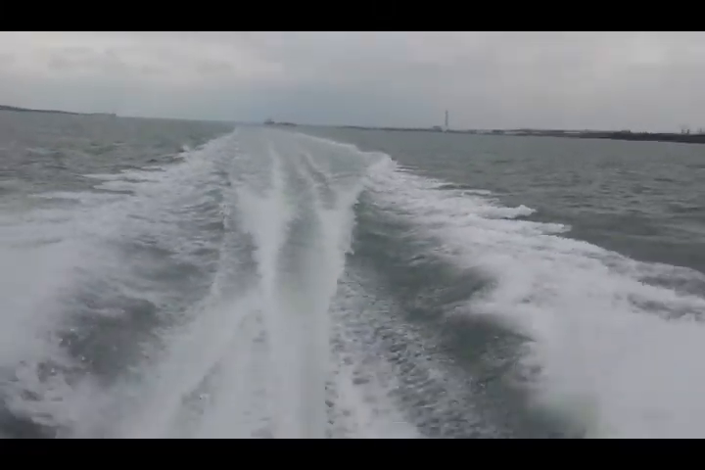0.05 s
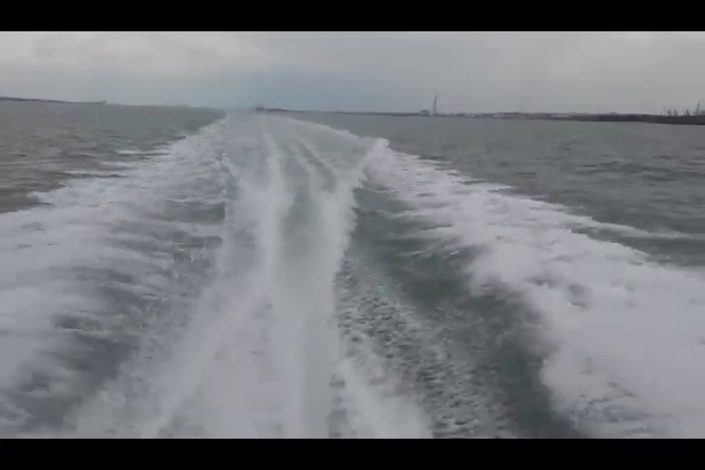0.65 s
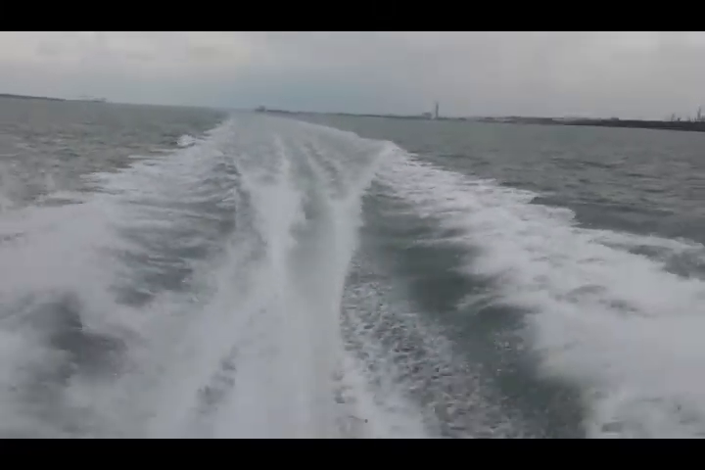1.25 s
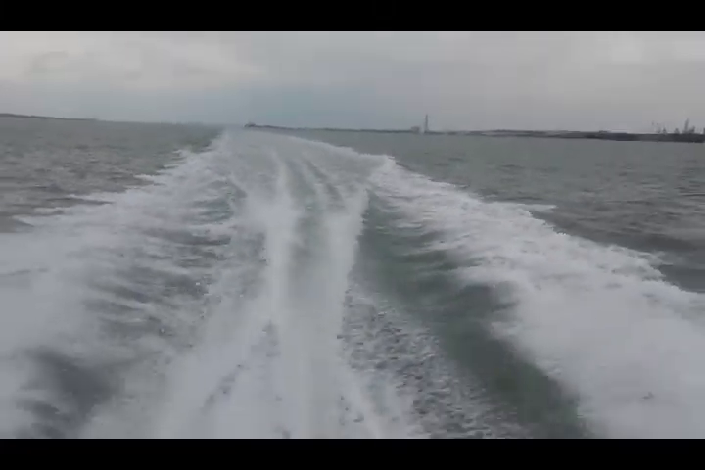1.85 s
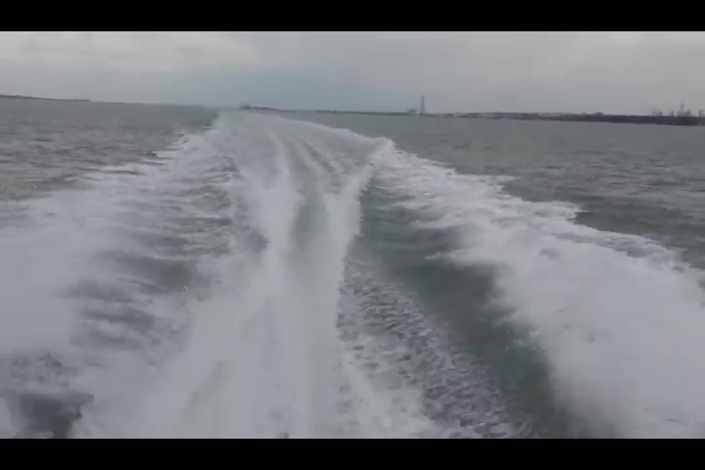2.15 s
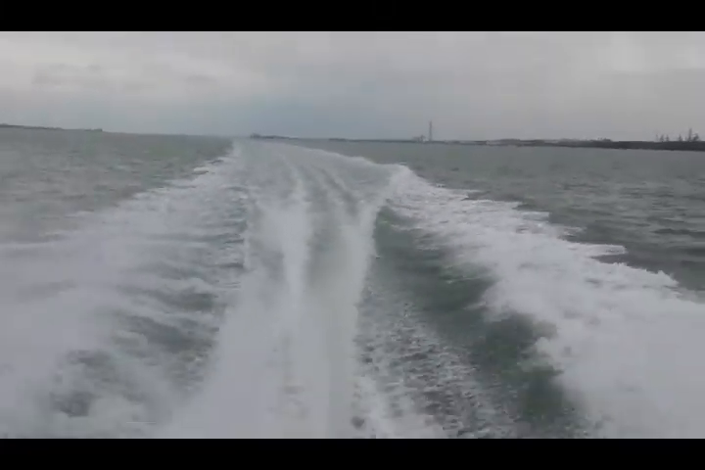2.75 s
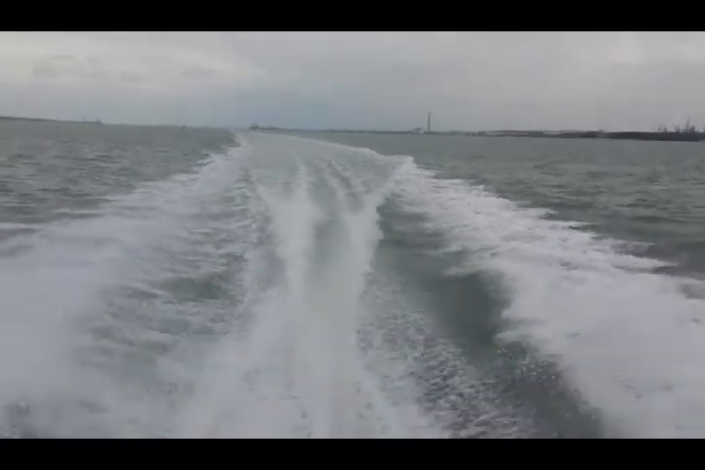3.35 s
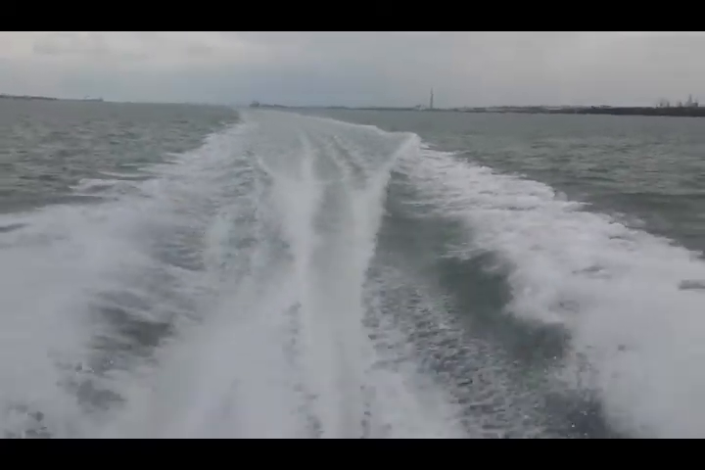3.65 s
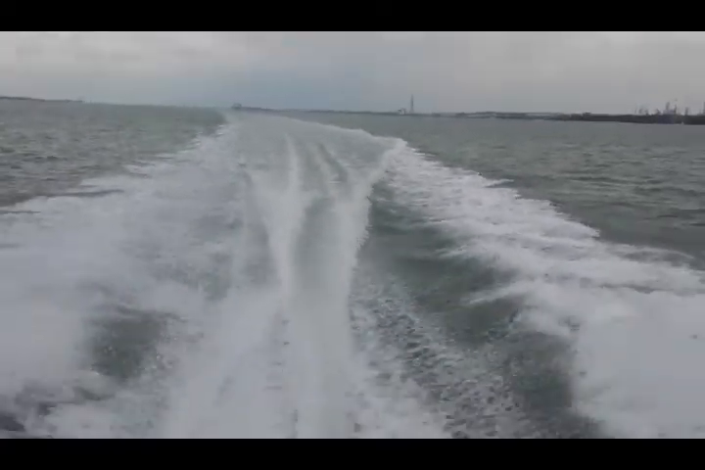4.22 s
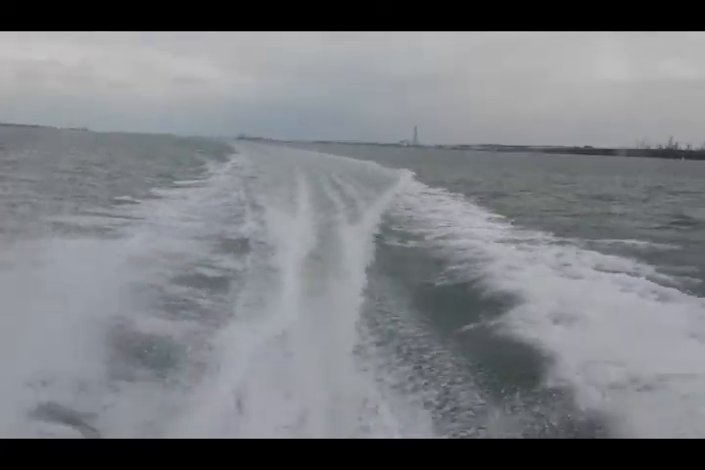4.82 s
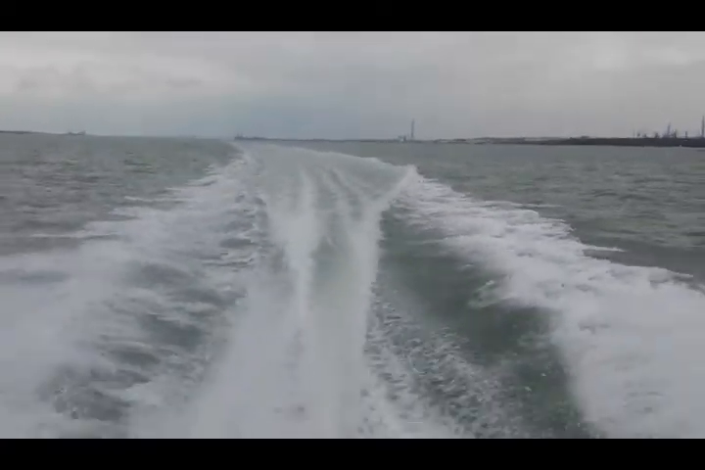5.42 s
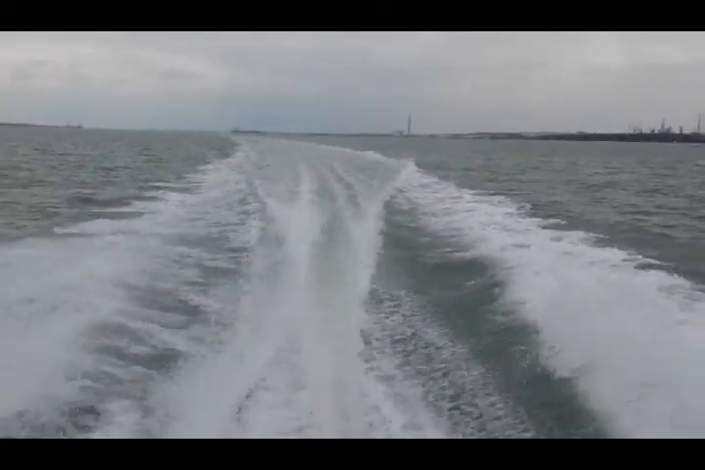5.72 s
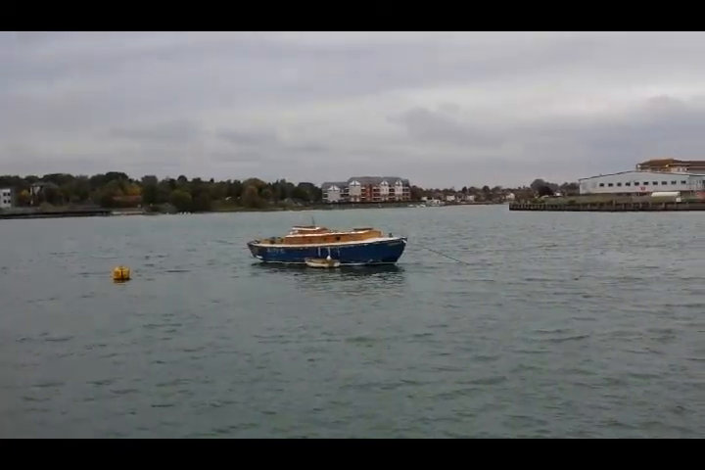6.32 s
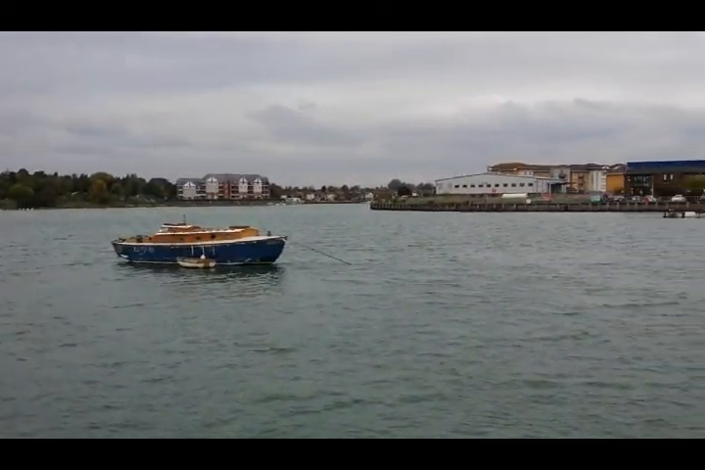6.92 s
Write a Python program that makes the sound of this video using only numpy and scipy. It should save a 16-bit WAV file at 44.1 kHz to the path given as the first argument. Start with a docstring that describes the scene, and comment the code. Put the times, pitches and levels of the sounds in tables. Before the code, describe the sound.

Heard from the stern of a fast motor boat on open water, the engine drones steadily with a thin whine while the churned wake roars and hisses. Small waves thump the hull and spray lands in short splashes. Near the end the sound cuts out for a moment. Then wind buffets the microphone over a very faint wash, with a few quick scuffs on the right side.

```python
"""At the stern of a motor boat at speed. A four-cylinder engine drones and whines, the propeller throbs,
the churned wake roars and hisses, spray lands, and small waves thump the hull. The sound cuts out
for a moment. Then the boat moves slowly: wind buffets the two microphone ports over a faint wash,
and something scuffs against the right one."""
import sys
import numpy as np
from scipy import signal
from scipy.io import wavfile
from scipy.ndimage import uniform_filter1d

SR = 44100
rng = np.random.default_rng(int(sys.argv[2]) if len(sys.argv) > 2 else 0)


def store_pcm(level_fs):
    """Save levels as 16-bit WAV."""
    pcm = np.round(np.clip(level_fs, -1, 1) * 32767).astype(np.int16)
    wavfile.write(sys.argv[1], SR, np.atleast_2d(pcm).T)


N = 307361
TIME_S = np.arange(N) / SR
CUT_S, RESUME_S = 5.822, 6.195
FIRING_ORDER, HOWL_ORDER, WHINE_ORDER = 4, 16, 44   # multiples of the cycle rate

# engine speed (time [s], four-stroke cycle rate [Hz])
CYCLE_RATE = [(0.0, 36.89), (0.45, 36.9), (0.89, 36.74), (1.19, 36.83), (1.34, 36.71), (1.78, 36.74),
              (1.93, 36.94), (2.83, 36.67), (3.12, 36.72), (3.57, 36.94), (3.87, 36.84), (4.16, 36.55),
              (4.76, 36.76), (5.06, 36.83), (5.65, 36.75), (5.8, 36.9)]
# exhaust drone (order, relative level [dB])
EXHAUST_ORDERS = [(1, -28.5), (2, -11), (3, -10.5), (4, 0), (5, -12.5), (6, -16.5), (7, -14.5), (8, -3),
                  (9, -18), (10, -15), (11, -19.5), (12, -19.5), (13, -15.5), (14, -21), (15, -18),
                  (16, -12), (17, -32.5), (18, -24), (19, -21), (20, -37), (21, -31.5), (22, -29.5),
                  (23, -38.5), (24, -25.5), (25, -27), (26, -28.5)]
# mechanical buzz above the drone (frequency [Hz], level per order [dB])
BUZZ_SPECTRUM = [(980, -58.5), (1080, -54.5), (1200, -41), (1350, -47.5), (1560, -44.5), (1850, -62),
                 (2200, -52.5), (2500, -64)]
# firing note between waves (time [s], level [dB])
FIRING_LEVEL = [(0, -16.5), (.7, -18), (1.3, -17), (2.4, -16.5), (4.85, -18.5), (5.15, -15.5), (5.8, -16)]
# octave over the firing note (time [s], relative level [dB])
OCTAVE_LEVEL = [(0.0, -22.5), (0.89, -19), (1.04, -22.1), (3.12, -22), (3.42, -26), (4.61, -21.5),
                (5.8, -24.5)]
# howl, two octaves over the firing note (time [s], level [dB])
HOWL_LEVEL = [(0.0, -26), (1.93, -30), (2.23, -23.5), (2.38, -30.5), (2.83, -30), (3.42, -25),
              (3.87, -27.5), (4.16, -34), (4.31, -31.5), (5.06, -28.5), (5.8, -29)]
# gear whine (time [s], relative level [dB])
WHINE_LEVEL = [(0.0, -33), (0.15, -34), (0.89, -30), (1.78, -35.5), (1.93, -37), (2.08, -33.7), (2.83, -27),
               (3.72, -32.5), (4.31, -29), (4.76, -34.7), (5.06, -26.5), (5.21, -34), (5.8, -32.9)]
# propeller tones (blade-rate harmonic, level [dB])
BLADE_HARMONICS = [(1, -24.5), (2, -25.5), (3, -43)]
# tones at the ports (frequency [Hz], left lead [rad], left-right [dB])
TONE_STEREO = [(70, .02, -1), (150, .07, -.5), (295, 0.36, -3), (474, .2, 2.5), (583, 1.2, -2),
               (704, 0.75, 0), (830, 0.43, -4.5), (1180, 2.22, 2.5), (1620, 2.57, 8)]

# wake strength (time [s], relative level [dB])
WAKE_LEVEL = [(0.0, -27.5), (0.3, -29), (0.89, -27.5), (1.78, -27), (2.83, -28), (4.31, -28.0), (4.46, -26),
              (4.76, -32), (5.06, -27.5), (5.8, -29)]
# low wake roar (frequency [Hz], relative density [dB])
ROAR_SPECTRUM = [(25, -23.5), (42, -2), (65, -5.5), (120, 2), (200, 2), (320, 1), (450, -9), (650, -11),
                 (900, -21.5), (1400, -26.5)]
# mid wake rush (frequency [Hz], relative density [dB])
RUSH_SPECTRUM = [(450, -8), (750, -1.5), (1050, -1), (1600, 3.5), (2100, -4), (2600, -6), (3600, -11.5),
                 (5500, -26.5)]
# hiss of fine drops (frequency [Hz], relative density [dB])
SPRAY_SPECTRUM = [(1800, -15), (2800, -3), (3700, -1.5), (4900, 1.5), (6300, 2), (7800, -0.5),
                  (10000, -18.5), (12500, -20.5), (14500, -30)]
# wake likeness at the ports (frequency [Hz], correlation [-1..1])
WAKE_CORRELATION = [(60, 0.7), (150, 0.7), (320, 0.98), (650, 0.3), (950, 0.1), (1350, -0.19),
                    (2100, -0.02), (3000, 0), (14000, 0)]
# wake balance (frequency [Hz], left-right [dB])
WAKE_PAN = [(60, -0.5), (370, 0), (800, -2), (1250, 0), (2300, 1), (4400, -4), (6200, 1), (7800, -10.5),
            (10000, -18.5), (13000, -26.5)]
# waves hitting the hull (time [s], relative level [dB], firing-note dip [dB])
WAVE_HITS = [(.865, -8.5, 6), (1.62, -13, 3), (2.245, -10, 5.5), (3.46, -16.5, -1), (3.71, -16.5, -1.5),
             (4.09, -9.5, 1.5), (4.29, -19.5, 15.5), (5.57, -10.5, 1)]
# spray landing (time [s], relative level [dB], t60 [s])
SPLASH_HITS = [(0.952, -22.5, 0.2), (0.998, -13.5, 0.084), (1.48, -17.5, 0.046), (1.733, -16.5, 0.043),
               (1.785, -19, 0.018), (1.911, -15, 0.02), (2.066, -22, .012), (2.453, -12.5, 0.011),
               (3.323, -21, 0.046), (3.533, -17, 0.08), (3.696, -18, .012), (4.214, -17.5, 0.032),
               (4.44, -28, .06), (4.683, -18, 0.037)]
# landing drops (frequency [Hz], relative density [dB])
SPLASH_SPECTRUM = [(1200, -6.5), (3500, 9.5), (6500, 6.0), (9000, -5), (13000, -17.5)]

# wind on the ports (time [s], relative level [dB])
WIND_LEVEL = [(6.195, -40), (6.25, -32.5), (6.37, -27), (6.42, -19.5), (6.97, -24)]
# wind rumble (frequency [Hz], relative density [dB])
WIND_SPECTRUM = [(25, -34), (45, -16), (70, -2.5), (130, 2), (280, -1.5), (500, -7.5), (800, -13),
                 (1200, -24.5), (2000, -41), (3500, -53)]
# wind balance by band (frequency [Hz], relative left-right [dB])
WIND_PAN = [(60, 2), (200, 3.5), (500, -2), (900, -5), (3000, 2)]
# scuffs on the right port (time [s], relative level [dB], t60 [s])
SCUFF_HITS = [(6.229, -23.5, 0.046), (6.27, -25, .04), (6.281, -21, 0.034), (6.309, -15, 0.025),
              (6.336, -11, 0.015), (6.351, -14, 0.062), (6.382, -16.5, 0.032), (6.478, -2, 0.021),
              (6.485, -8.5, 0.044), (6.508, -26.5, 0.15), (6.692, -31, 0.019), (6.788, -23.5, 0.031),
              (6.839, -28, 0.018), (6.896, -19.5, 0.0086)]
# cavity behind the port (frequency [Hz], width [Hz], relative gain [dB])
CAVITY_MODES = [(500, 670, 0.5), (1040, 330, 6.5), (1370, 230, -0.5), (1690, 360, -1.5), (2520, 850, -10.5),
                (3758, 370, -14), (4300, 490, -16.5), (6500, 5700, -27)]
# machinery resonances (frequency [Hz], width per stage [Hz], level [dB], left-right [dB])
MACHINE_MODES = [(1655, 100, -48, -4), (2042, 70, -42, -7), (2215, 20, -47.5, -3.5), (2617, 21, -56, 1),
                 (3340, 30, -55.5, 0), (4904, 50, -44, 0), (5150, 60, -48.5, -1), (6270, 660, -40, 7.5)]
# machinery squeaks (time [s], frequency [Hz], peak [dB], 1/e half-width [s])
MACHINE_SQUEAKS = [(3.953, 2100, -30, 0.013), (4.29, 3050, -35, .03), (4.464, 3320, -35, .04),
                   (5.63, 3280, -32.5, .035), (5.765, 7300, -28, .02)]
# slow wash along the hull (time [s], level [dB])
WASH_LEVEL = [(6.195, -77), (6.28, -65), (6.38, -60), (6.44, -59), (6.62, -53.5), (6.97, -56.5)]
# wash hiss (frequency [Hz], relative density [dB])
WASH_SPECTRUM = [(1800, -5), (3500, -3), (5000, 5), (6300, 8), (8000, -5), (10000, -13), (13000, -36)]


def engine(cycle_rad, cycle_hz, drone_db=-18.5, waver_hz=6, jitter_rad=0.1):
    """Firings give every fourth order in step; unequal cylinders and moving parts fill in the rest."""
    levels_db = {k: drone_db + db + 1.96 * drift(6.3) for k, db in EXHAUST_ORDERS}
    for order in range(len(EXHAUST_ORDERS) + 1, 64):
        levels_db[order] = at_hz(BUZZ_SPECTRUM, order * cycle_hz) + 4.0 * drift(7)
    # the settling stern muffles the exhaust
    muffle_db = sum(dip_db * stern_depth(hit_s) for hit_s, _, dip_db in WAVE_HITS)
    levels_db[FIRING_ORDER] = curve(FIRING_LEVEL) - muffle_db + 1.44 * drift(waver_hz)
    levels_db[2 * FIRING_ORDER] = curve(OCTAVE_LEVEL) + 0.74 + 1.9 * drift(waver_hz)
    levels_db[HOWL_ORDER] = curve(HOWL_LEVEL) + 1.5 * drift(waver_hz)
    levels_db[WHINE_ORDER] = curve(WHINE_LEVEL) - 0.5 + 1.6 * drift(waver_hz)
    out = 0
    for order, level_db in levels_db.items():
        offset_rad = rng.uniform(0, 2 * np.pi) * (order % FIRING_ORDER > 0)
        phase_rad = order * cycle_rad + offset_rad + jitter_rad * drift(6.8)
        out += tone(phase_rad, order * cycle_hz, level_db)
    return out


def propeller(cycle_rad, cycle_hz, blades_per_cycle=3.058, uneven_db=1.0, jitter_rad=0.39):
    """Blades beat through uneven water, just off the engine's third order."""
    blade_rad = blades_per_cycle * cycle_rad + jitter_rad * drift(2.0)
    blade_hz = blades_per_cycle * cycle_hz
    return sum(tone(k * blade_rad, k * blade_hz, db + uneven_db * drift(8)) for k, db in BLADE_HARMONICS)


def wake(cycle_rad, roar_db=-19.0, spray_db=-26.5, churn_db=0.9, surge_db=2, grain_db=0.56):
    """Churned water roars with the exhaust puffs, rushes with each crank turn, hisses as fine drops."""
    strength_db = curve(WAKE_LEVEL) + churn_db * drift(7)
    swing_db = strength_db - strength_db.mean()
    # the settling stern pushes water aside and throws spray
    depth = sum(stern_depth(hit_s) for hit_s, _, _ in WAVE_HITS)
    stereo = dict(correlation=WAKE_CORRELATION, balance=WAKE_PAN)
    roar = band_noise(ROAR_SPECTRUM, flicker_db=1.5, flicker_hz=10, **stereo)
    rush = band_noise(RUSH_SPECTRUM, flicker_db=1.34, flicker_hz=8, **stereo)
    spray = band_noise(SPRAY_SPECTRUM, flicker_db=1.09, flicker_hz=17, **stereo)
    puffs = 1 + 0.22 * np.cos(FIRING_ORDER * cycle_rad)
    crank_pulse = 1 + 0.2 * np.cos(2 * cycle_rad)
    roar *= from_db(roar_db + 0.62 * swing_db) * puffs
    rush *= from_db(strength_db - 0.14 + surge_db * depth) * crank_pulse
    spray *= from_db(spray_db + 0.6 * swing_db + 0.45 * depth + grain_db * drift(60))
    return roar + rush + spray


def hull(gain_db=3.0, t60_s=0.3, band_hz=(50, 95)):
    """Each wave shakes the hull with a short, deep shudder."""
    shudder = butterworth(rng.standard_normal(N), band_hz, "band")
    running_rms = np.sqrt(uniform_filter1d(shudder ** 2, size=1000) + 1e-12)
    hits = [(hit_s, db + gain_db, t60_s) for hit_s, db, _ in WAVE_HITS]
    return shudder / running_rms * swells(hits, rise_s=0.03)


def stern_depth(hit_s, delay_s=0.13, half_width_s=0.067):
    """The stern settles after a wave; depth 0..1."""
    return bump(hit_s + delay_s, half_width_s)


def splashes(grain_db=4.5):
    """Spray lands as short, bright clumps of drops."""
    drops = band_noise(SPLASH_SPECTRUM, flicker_db=-1.2, flicker_hz=210, balance=WAKE_PAN)
    return drops * swells(SPLASH_HITS, rise_s=0.0014) * from_db(grain_db * drift(150))


def port_rumble(eddy_db=2.0, windward_db=3.5, thud_db=-14, thud_t60_s=0.21):
    """Wind eddies buffet each port separately; the left faces the wind, scuffs thud in the right."""
    eddies = np.array([drift(41), drift(49)])
    pressure = from_db(curve(WIND_LEVEL) + eddy_db * eddies) * pan(windward_db)
    thuds = [(hit_s, thud_db + 0.52 * db, thud_t60_s) for hit_s, db, _ in SCUFF_HITS]
    pressure[1] += swells(thuds, rise_s=0.0022)
    return pressure * band_noise(WIND_SPECTRUM, flicker_db=0.5, flicker_hz=16, balance=WIND_PAN)


def scuffs(slips_per_s=1500, spread_db=3.5, catch_db=9.5, left_db=-26, top_hz=8000):
    """A sharp catch, then a run of uneven slips, rings the cavity behind the right port."""
    slipping = rng.random(N) < slips_per_s / SR
    slips = slipping * from_db(spread_db * rng.standard_normal(N)) * rng.choice([-1, 1], N)
    force = unit_rms(slips) * swells(SCUFF_HITS, rise_s=0.002)
    for hit_s, level_db, _ in SCUFF_HITS:
        force[round(hit_s * SR)] += from_db(level_db + catch_db)
    ringing = sum((-1) ** k * from_db(db) * resonance(force, hz, width_hz)
                  for k, (hz, width_hz, db) in enumerate(CAVITY_MODES))
    dulled = butterworth(ringing, top_hz, "low")   # soft contact
    return unit_rms(dulled) * force.std() * from_db([[left_db], [0]])


def machinery(squeak_waver=0.022):
    """Vibration keeps narrow resonances singing; now and then something squeaks."""
    out = 0
    for hz, width_hz, level_db, balance_db in MACHINE_MODES:
        vibration = rng.standard_normal((2, N))
        ringing = resonance(resonance(vibration, hz, width_hz), hz, width_hz)
        out += unit_rms(ringing) * from_db(level_db) * pan(balance_db)
    for peak_s, hz, peak_db, half_width_s in MACHINE_SQUEAKS:
        phase_rad = 2 * np.pi * np.cumsum(hz * (1 + squeak_waver * drift(200))) / SR
        out += np.sin(phase_rad) * from_db(peak_db) * bump(peak_s, half_width_s)
    return out


def wash():
    """Slow water hisses faintly along the hull."""
    return band_noise(WASH_SPECTRUM, flicker_db=3.5, flicker_hz=9.7) * from_db(curve(WASH_LEVEL))


def tone(phase_rad, hz, rms_db):
    """A sine as it reaches the two ports."""
    lead_rad = at_hz(TONE_STEREO, hz) / 2 * np.array([[1], [-1]])
    balance_db = at_hz(TONE_STEREO, hz, column=2)
    return np.sqrt(2) * from_db(rms_db) * np.cos(phase_rad + lead_rad) * pan(balance_db)


def band_noise(spectrum, flicker_db, flicker_hz, correlation=None, balance=None):
    """Stereo noise in 0.4-octave bands, each with its own level, flicker and image; rms 1."""
    edges_hz = 22 * 2 ** np.arange(0, 9.7, 0.4)
    white = rng.standard_normal((2, 2, N))
    out = 0
    for k, (low_hz, high_hz) in enumerate(zip(edges_hz, edges_hz[1:])):
        hz = np.sqrt(low_hz * high_hz)
        flicker = drift(flicker_hz)
        if high_hz < spectrum[0][0] or low_hz > spectrum[-1][0]:
            continue
        mid, side = butterworth(white[k % 2], [low_hz, high_hz], "band")
        alike = np.clip(at_hz(correlation, hz), -1, 1) if correlation else 0
        ports = np.sqrt(1 + alike) * mid + np.sqrt(1 - alike) * side * [[1], [-1]]
        balance_db = at_hz(balance, hz) if balance else 0
        out += ports * from_db(at_hz(spectrum, hz) + flicker_db * flicker) * pan(balance_db)
    return unit_rms(out)


def drift(corner_hz, hop=40):
    """Random wander: coarse noise through two one-pole low-passes; rms 1."""
    pole = np.exp(-2 * np.pi * hop * corner_hz / SR)
    noise = rng.standard_normal(N // hop + 2002)
    slow = signal.lfilter([1], [1, -2 * pole, pole ** 2], noise)[2000:]
    return np.interp(np.arange(N) / hop, np.arange(len(slow)), unit_rms(slow))


def swells(events, rise_s):
    """Rise-and-decay envelope of events (time [s], level [dB], t60 [s])."""
    out = np.zeros(N)
    for start_s, level_db, t60_s in events:
        age_s = np.maximum(TIME_S - start_s, 0)
        attack = 1 - np.exp(-age_s / rise_s)
        out += attack * from_db(level_db - 60 * np.minimum(age_s / t60_s, 2))
    return out


def bump(peak_s, half_width_s):
    """Gaussian envelope; peak 1."""
    return np.exp(-np.minimum(((TIME_S - peak_s) / half_width_s) ** 2, 50))


def resonance(x, hz, width_hz):
    """Two-pole resonator; peak gain 1."""
    radius = np.exp(-np.pi * width_hz / SR)
    feedback = [1, -2 * radius * np.cos(2 * np.pi * hz / SR), radius ** 2]
    return signal.lfilter(np.array([1, 0, -1]) * (1 - radius ** 2) / 2, feedback, x + 1e-18)


def butterworth(x, edge_hz, kind, order=2):
    """Flat-passband filter."""
    return signal.sosfilt(signal.butter(order, edge_hz, kind, fs=SR, output="sos"), x)


def curve(rows):
    """Rows (time [s], value), interpolated per sample."""
    return np.interp(TIME_S, *np.transpose(rows))


def at_hz(rows, hz, column=1):
    """Table lookup on a log-frequency axis."""
    table = np.array(rows)
    return np.interp(np.log(hz), np.log(table[:, 0]), table[:, column])


def pan(balance_db):
    """Left and right gains for a level difference."""
    return from_db(np.array([[1], [-1]]) * balance_db / 2)


def from_db(db):
    """Decibels to gain."""
    return 10 ** (np.asarray(db) / 20)


def unit_rms(x):
    """Scale to rms 1."""
    return x / np.sqrt(np.mean(x ** 2) + 1e-20)


def scene(low_cut_hz=39):
    """Fast run, silent gap, then wind at low speed; deepest bass cut."""
    cycle_hz = curve(CYCLE_RATE)
    cycle_rad = 2 * np.pi * np.cumsum(cycle_hz) / SR
    drive = engine(cycle_rad, cycle_hz.mean()) + propeller(cycle_rad, cycle_hz.mean()) + machinery()
    fast = drive + wake(cycle_rad) + splashes() + hull()
    slow = port_rumble() + wash() + scuffs()
    fast, slow = butterworth([fast, slow], low_cut_hz, "high", order=4)
    fade_db = np.interp(TIME_S - CUT_S, [0, 0.003, 0.02, 0.04], [0, -27, -38, -140])
    return fast * from_db(fade_db) + slow * (TIME_S > RESUME_S)


def record(dry, cutoff_hz=13050):
    """Soft peak limit, then a steep low-pass."""
    rounded = dry / (1 + dry ** 8) ** (1 / 8)
    return signal.sosfilt(signal.ellip(10, 0.1, 80, cutoff_hz, fs=SR, output="sos"), rounded)


dry = scene()
out = record(dry)
store_pcm(out)
```